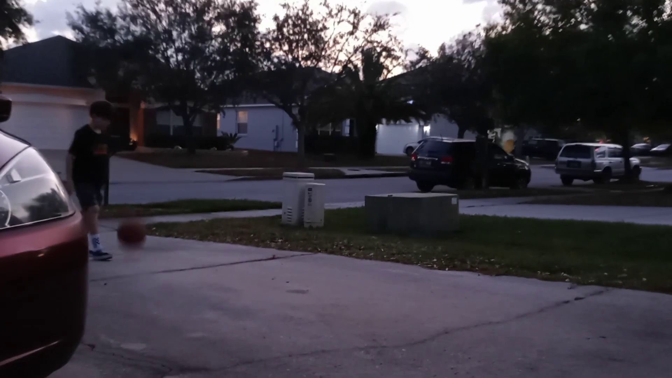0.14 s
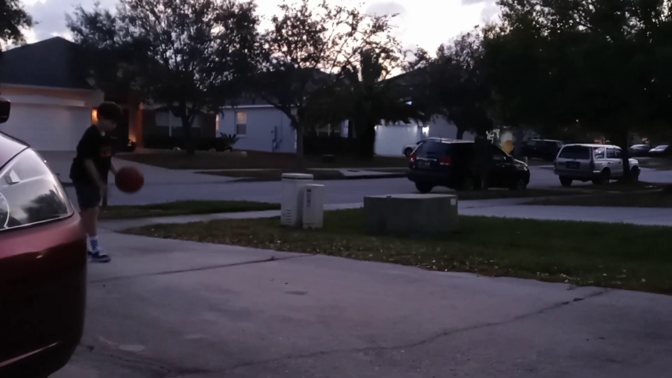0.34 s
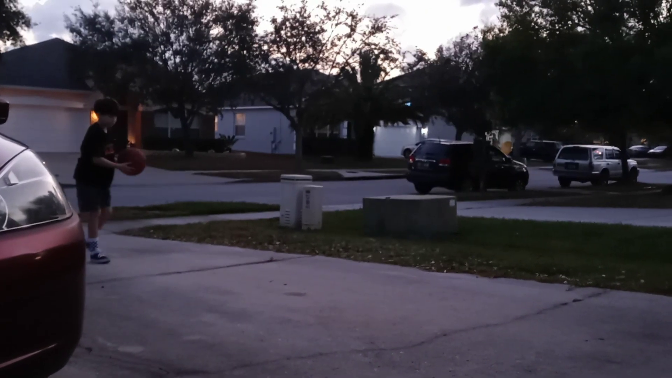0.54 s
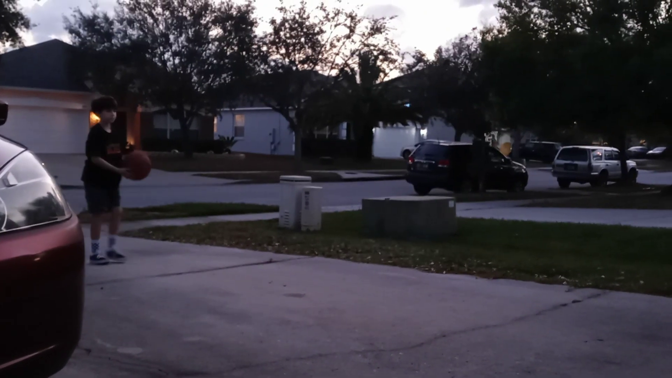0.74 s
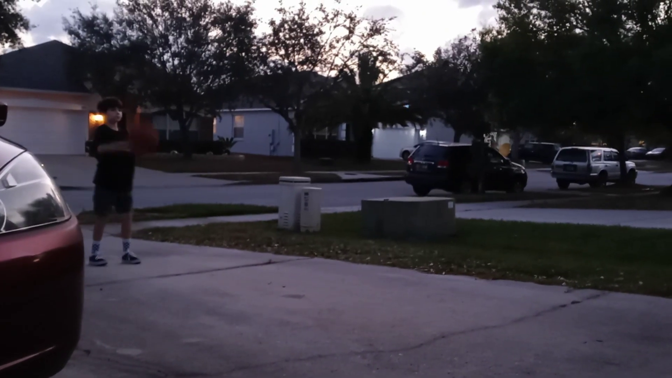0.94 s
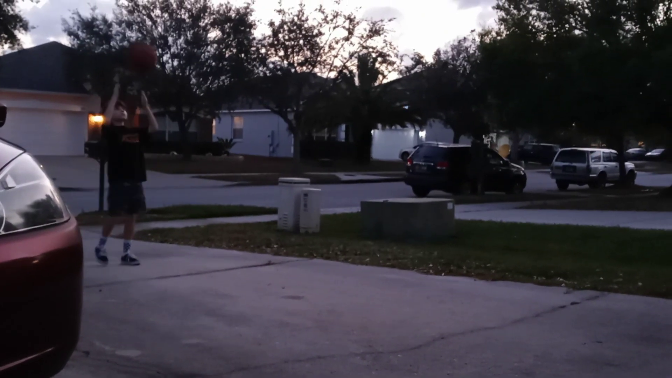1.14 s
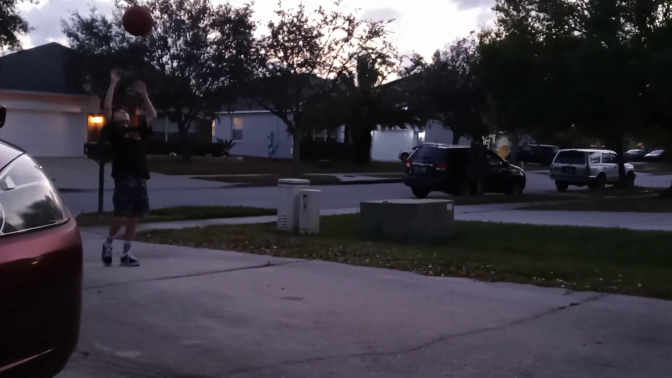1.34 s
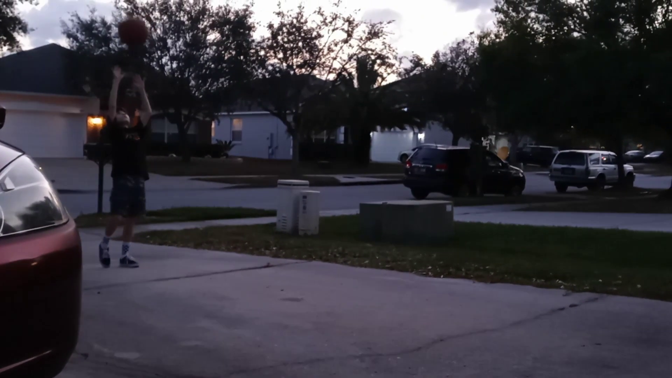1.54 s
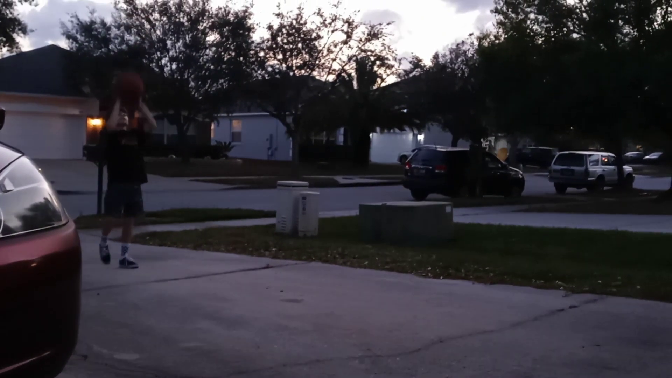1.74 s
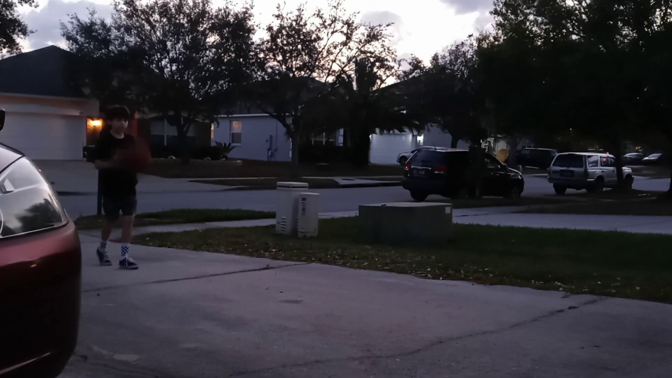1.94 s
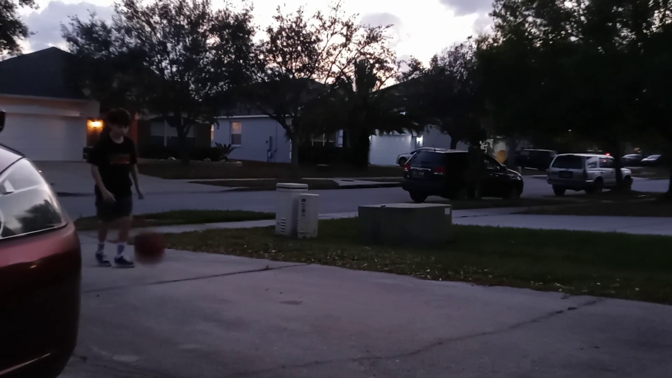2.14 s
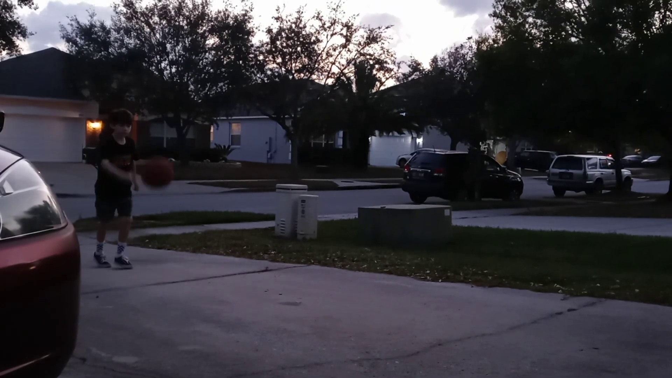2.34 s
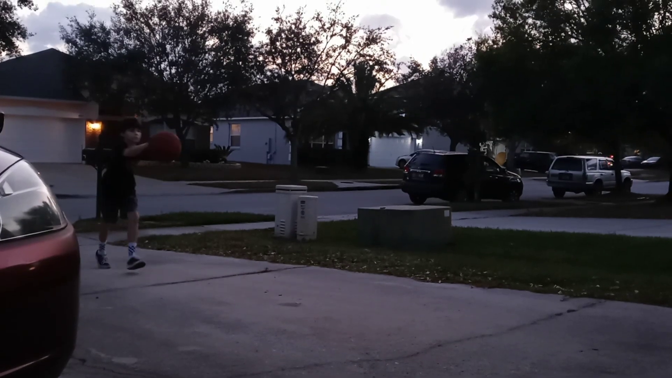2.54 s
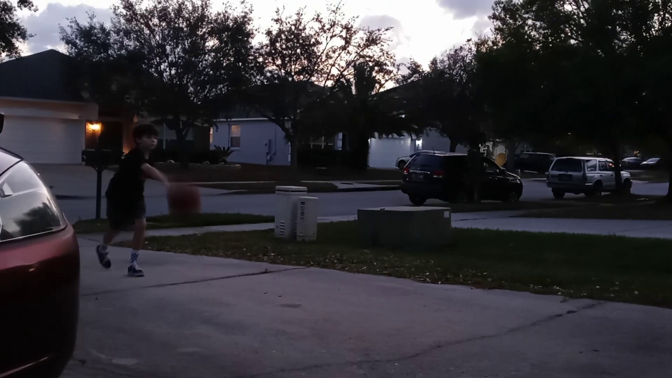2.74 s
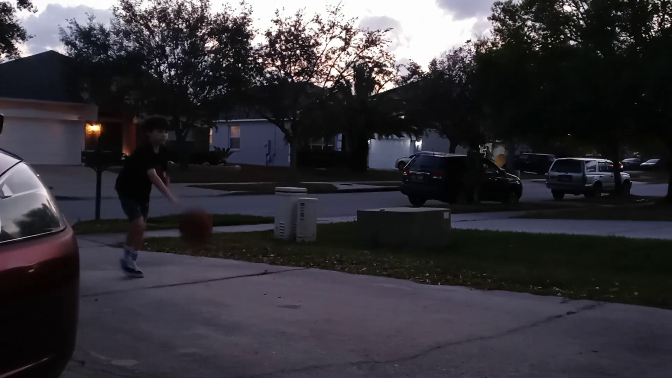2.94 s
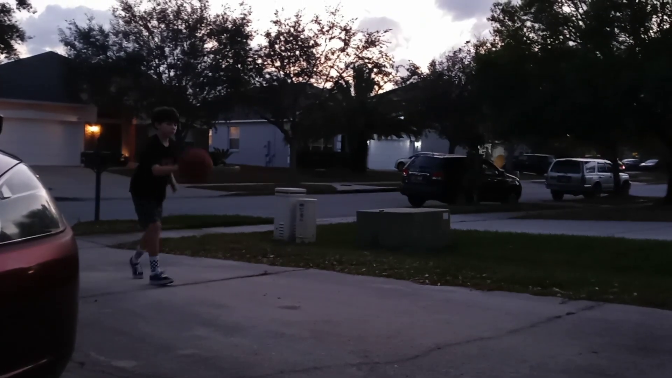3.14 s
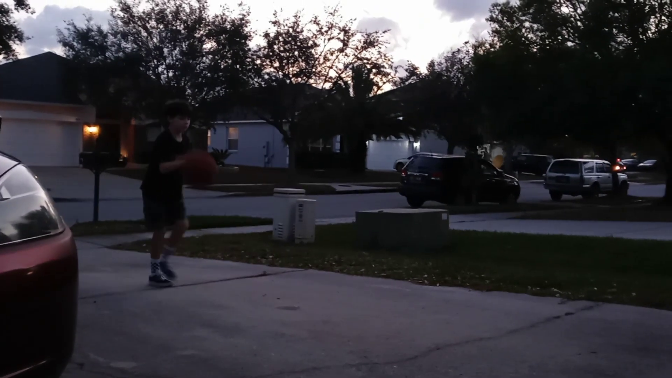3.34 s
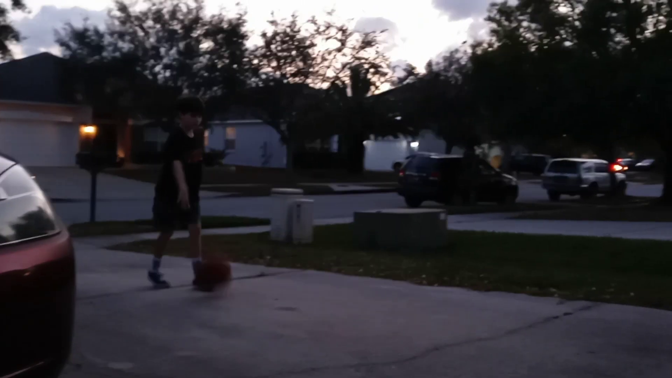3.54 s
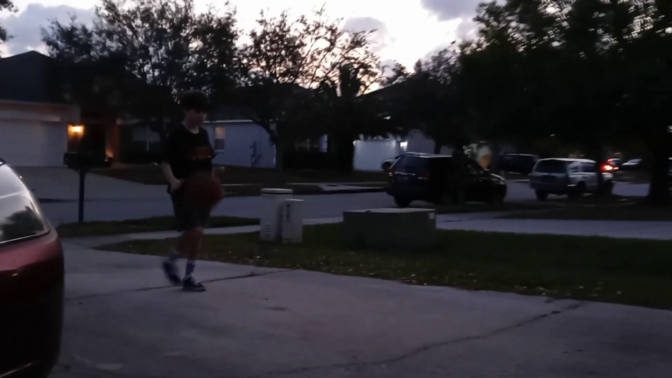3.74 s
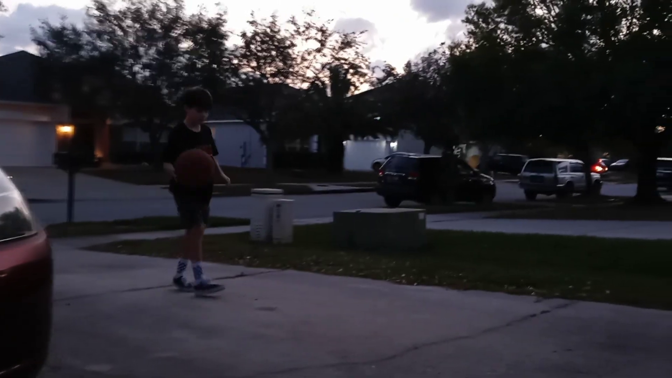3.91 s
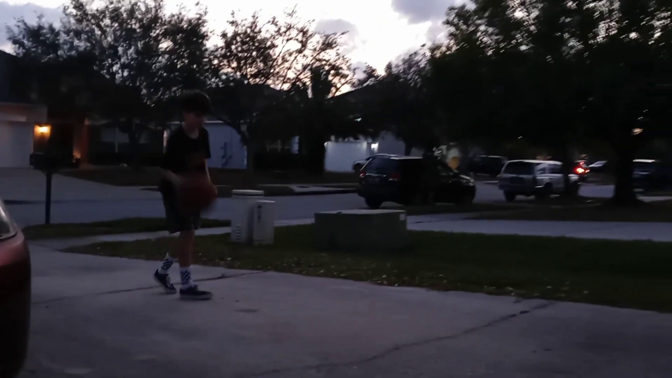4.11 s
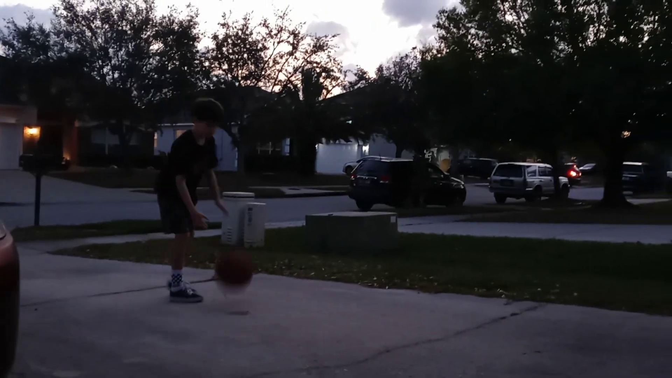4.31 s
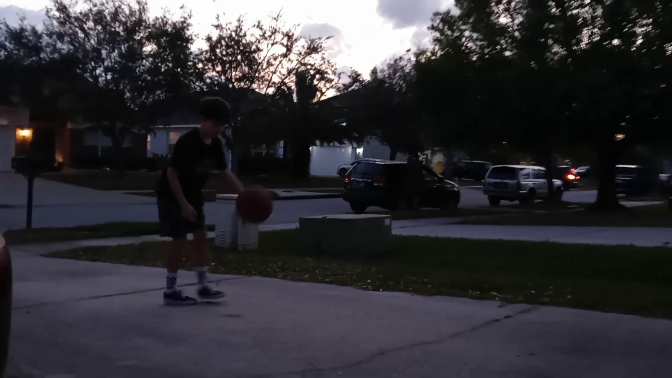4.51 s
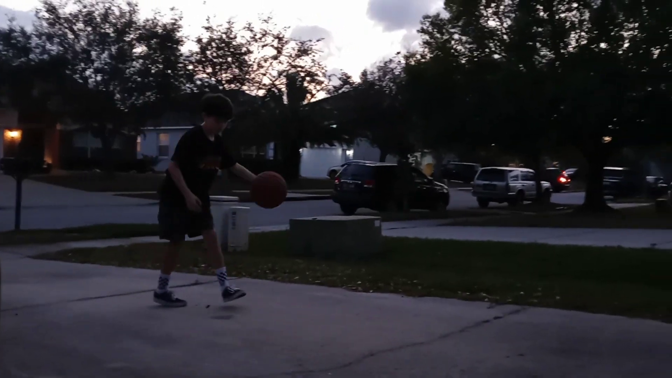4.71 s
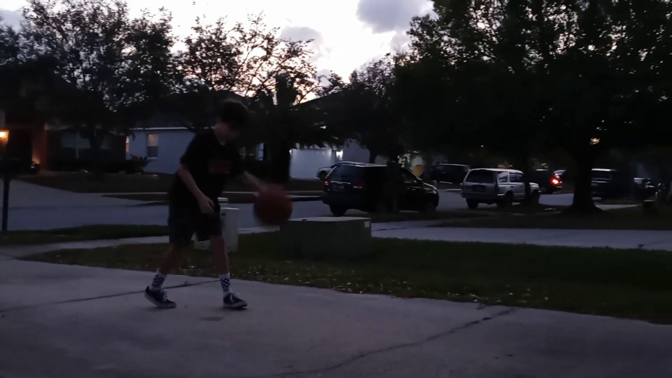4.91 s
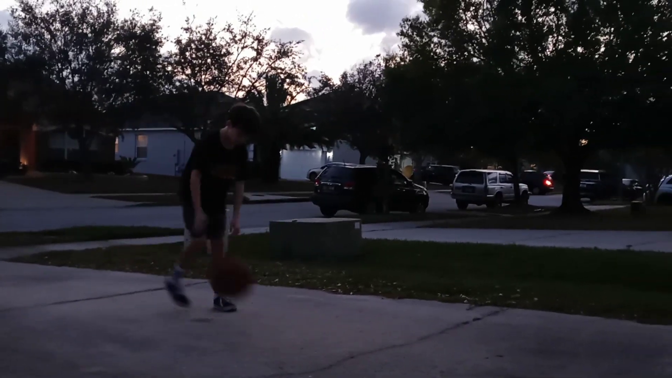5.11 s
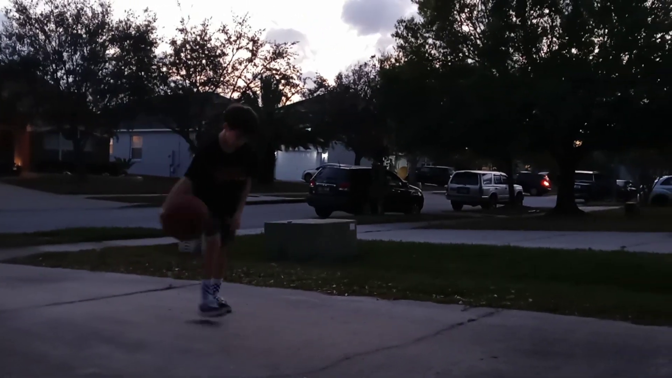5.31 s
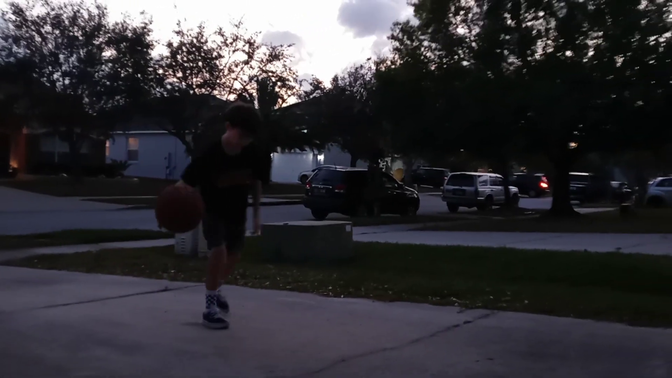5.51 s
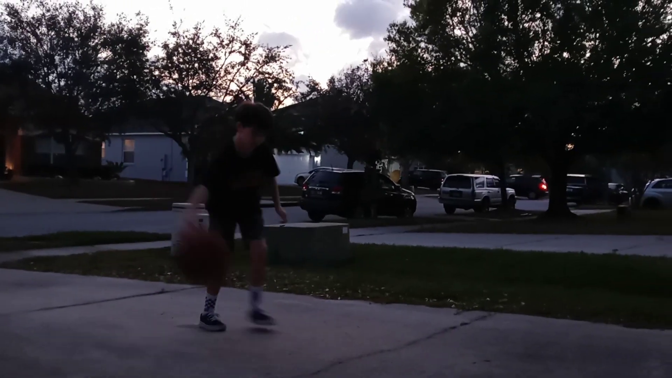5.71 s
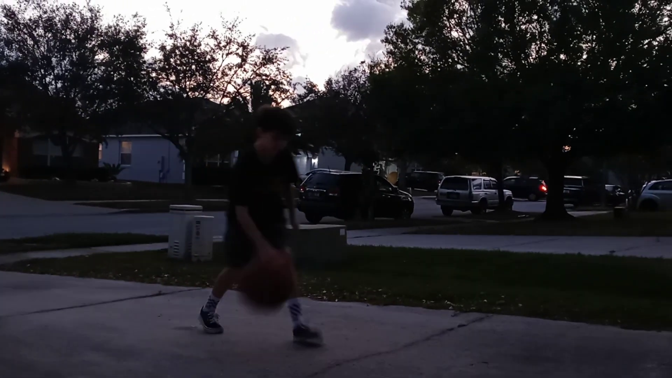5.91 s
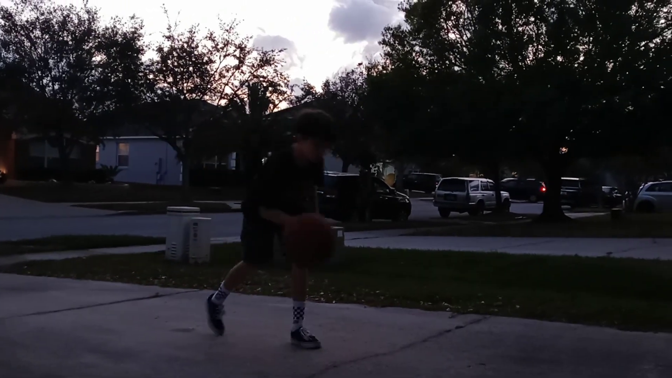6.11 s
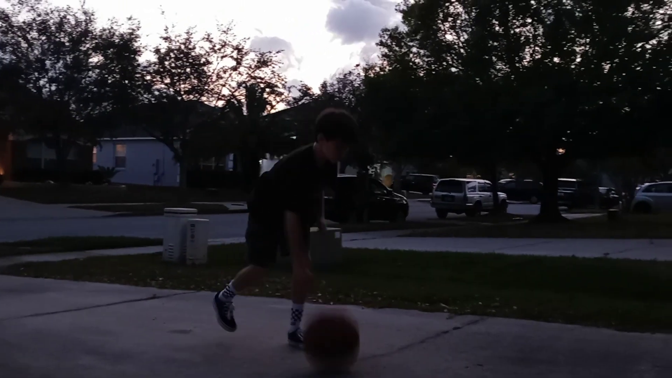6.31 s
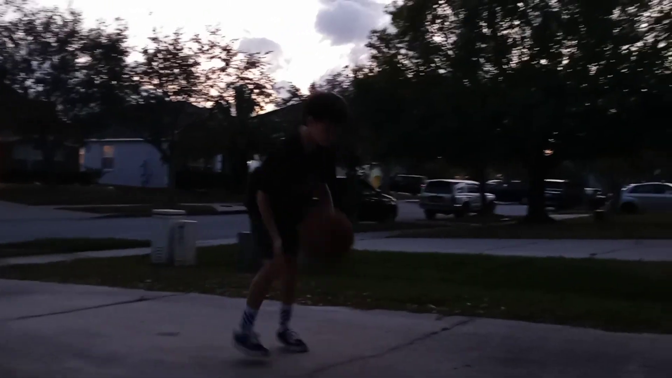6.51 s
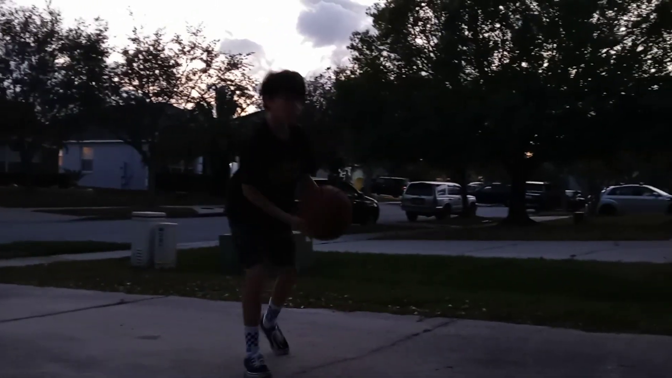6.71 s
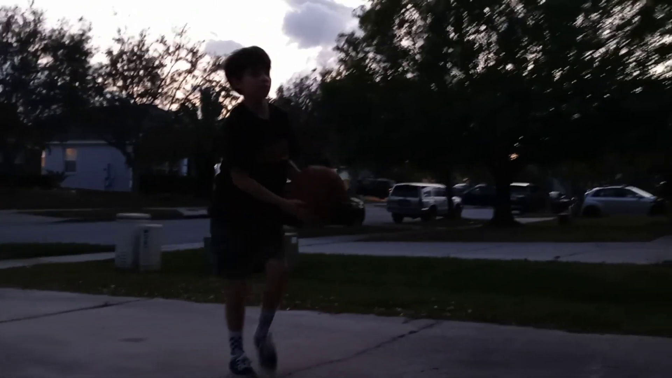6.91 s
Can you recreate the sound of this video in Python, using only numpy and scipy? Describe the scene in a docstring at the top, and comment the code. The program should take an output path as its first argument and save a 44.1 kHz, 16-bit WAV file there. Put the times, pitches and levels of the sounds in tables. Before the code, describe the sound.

A basketball bounces on a concrete driveway, at first sparsely, then in a steadier dribble coming closer, with shoe scuffs, hand slaps and distant traffic.

```python
"""A basketball is bounced on a concrete driveway by a player who works towards the microphone.
From the start, distant traffic and hiss (filtered noise) lie under a thin sizzle (narrow-band noise) that dies away;
fine grit ticks (filtered impulses) and shoes scuff (grainy noise bursts). Each bounce is then a thump (one swing of
pressure), a crack (noise bursts) and a ring of shell and air (damped modes), returned by car, house and yard.
Later grit snaps (clicks), cloth rustles (soft noise), hands slap the ball (dull clicks) and the feet shuffle."""
import sys
import numpy as np
from scipy import signal
from scipy.fft import rfft, irfft
from scipy.io import wavfile
from scipy.ndimage import uniform_filter1d, minimum_filter1d

SR = 44100
rng = np.random.default_rng(int(sys.argv[2]) if len(sys.argv) > 2 else 0)


def put_to_file(sound):
    """Save the sound as 16-bit audio at rate SR, in the file named by the first command-line argument."""
    columns = np.atleast_2d(sound).T  # one column per channel
    safe = np.clip(columns, -1, 1)
    whole_steps = np.round(safe * 32767)
    wavfile.write(sys.argv[1], SR, whole_steps.astype(np.int16))


N = 306936
TIME = np.arange(N) / SR  # s, whole scene
BLOW_TIME = np.arange(SR) / SR  # s, within one blow

# All levels are relative; a spectrum is a level curve over frequency, rescaled wherever it is used.
# level of distant traffic, before its sway: start_s, level_db
TRAFFIC_LEVEL = [(0, -42.5), (.8, -44), (2.7, -43.5), (3.3, -43), (6.96, -42.5)]
# spectrum of distant traffic: pitch_hz, level_db
TRAFFIC_SPECTRUM = [(25, -21), (45, -15.5), (70, 0), (120, 1.5), (230, -2.5), (330, -13), (550, -13),
                    (830, -6), (1250, -13), (1650, -22.5), (2150, -34), (3000, -58), (6000, -46)]
# spectrum of the hiss of the air: pitch_hz, level_db
HISS_SPECTRUM = [(1500, -27), (2600, -7), (3500, 1), (5200, -6.5), (6700, -3), (7500, -17.5),
                 (10000, -18.5), (12500, -11.5), (16000, -21)]
# soles scraping as the player turns and pushes off: start_s, length_s, level_db at the starting spot,
# tilt_db per octave in the treble
SCUFF_EVENTS = [(0, 0.081, -47.5, -11), (0.159, 0.025, -43.5, -1), (0.533, 0.01, -45.5, -1),
                (1.092, 0.044, -48, 6), (1.287, 0.026, -48.5, 0), (2.057, 0.04, -45.5, -4),
                (3.181, 0.02, -43, -4), (4.04, 0.012, -36, 2.5), (5.349, 0.014, -47, -5),
                (5.4545, 0.01, -31.5, 3.5), (6.244, 0.02, -50, 4), (6.673, 0.017, -35, -1.5),
                (6.7, 0.029, -30, 1), (6.762, .19, -61, 4)]
# spectrum of shoe and grit on concrete: pitch_hz, level_db
SCUFF_SPECTRUM = [(200, -7.5), (1000, -11), (2200, -9.5), (3400, 1.5), (5000, -1.5), (6400, 0.5),
                  (7800, -16.5), (10000, -8.5), (12500, -1), (16000, -16)]
# bounces: start_s, force_db, crack_db over thump, ring_db, strong_hz (strongest ring), ping (which lingers), ping_db
BOUNCE_EVENTS = [ (0.2017, -16.5, 22, -29, 1137, "high", -47.5),
                 (2.2033, -15.5, 26, -26, 1800, "high", -38.5),
                 (2.9385, -13, 20.5, -16.5, 1120, "high", -46),
                 (3.6165, -12.5, 21, -18.5, 1675, "low", -55), (4.3675, -18, 24, -20.5, 1638, "low", -41),
                 (5.1524, -12.5, 20, -15.5, 1030, "low", -57),
                 (5.9099, -14.5, 20.5, -17.5, 1309, "low", -46),
                 (6.3944, -13, 21.5, -18.5, 1398, "low", -45)]
# spectrum of rubber cracking on concrete, before its tilt: pitch_hz, level_db
CRACK_SPECTRUM = [(150, -24), (400, -9.5), (600, -6), (1100, -6), (1800, -0.5), (2300, -5.5), (3000, -5),
                  (3800, 2), (5000, -5.5), (6500, -5.5), (7800, -18), (10000, -13), (12500, -8),
                  (16000, -17.5)]
# deep wobbles of the rubber shell, before random scatter: pitch_hz, level_db, t60_s
SHELL_MODES = [(108.5, -14.5, 0.28), (195.3, -13.5, 0.18), (248.2, -11, 0.22), (346, -13, 0.13),
               (391, -8.5, 0.086), (490.5, -14, 0.16), (797, -6.5, 0.051), (932, -8.5, 0.057)]
# ring of the air inside the ball, before random scatter: pitch_hz, level_db, t60_s
AIR_MODES = [(1041.6, -8, 0.081), (1119, -4.5, 0.052), (1236, -9, 0.13), (1457, -5.5, 0.042),
             (1676, -12.5, 0.08), (1770, -16.5, 0.08), (1970, -10, 0.031), (3033, -14, 0.035),
             (3660, -15, 0.077)]
# two air modes that linger as a faint ping, low then high: pitch_hz, t60_s
PING_MODES = [(2169, .55), (2864, 1.15)]
# echoes off the garage and the house: delay_s, level_db, top_hz
HOUSE_ECHOES = [(0.0092, -12.5, 500), (.0138, -18, 5016), (0.028, -15.5, 400), (0.032, -14, 1496),
                (0.0475, -13.5, 455), (.063, -20, 404), (.078, -26.5, 400), (.092, -17, 346)]
# diffuse reverberation of the yard by band: pitch_hz, level_db, t60_s
YARD_BANDS = [(61.2, 5, 0.42), (132, -6, 0.77), (305, -3, 0.33), (610, 4.5, 0.36), (1220, -4.5, 0.49),
              (2400, -1, 0.41), (4180, -10, 0.48), (6550, 0.5, 0.44), (8400, 6.5, 0.33),
              (12140, -6.5, 0.32), (16000, -21, .2)]
# grit snapping under a shoe: start_s, level_db
GRIT_SNAPS = [(2.7615, -15), (2.767, -27), (4.7502, -25.5), (5.975, -14), (6.003, -15), (6.7194, -28)]
# clothes rubbing as the ball is gathered: start_s, length_s, level_db
RUSTLE_EVENTS = [(3.983, 0.076, -45), (4.086, 0.049, -41)]
# spectrum of cloth: pitch_hz, level_db
CLOTH_SPECTRUM = [(80, -12), (150, -8), (380, 4), (600, -21), (2000, -32), (12000, -28)]
# hands meeting the ball: start_s, level_db
SLAP_EVENTS = [(4.043, -38), (5.4742, -2.5), (6.941, -11.5)]
# spectrum of a slap: pitch_hz, level_db
SLAP_SPECTRUM = [(80, 5), (300, 3.5), (900, 7), (1500, -4), (2400, -0.5), (3500, -8.5), (8000, -39),
                 (16000, -40)]

# the player dribbles on the spot, then walks towards the microphone
START_M, SETS_OFF_S, WALK_M_S = 8.14, 2.26, 0.74
# hiss at the starting spot, and its rise per dB of nearness
HISS_DB, HISS_RISE_PER_DB = -58, 1.2
# sizzle: steady level, extra level and pitch at the start, and the pitch it tends to
SIZZLE_DB, SIZZLE_FLARE_DB, SIZZLE_START_HZ, SIZZLE_HZ = -60, 13, 3950, 4490
# time constants of its flare and glide, then its dying away
SIZZLE_SETTLE_S, SIZZLE_GLIDE_S, SIZZLE_ENDS_S, SIZZLE_FADE_DB_PER_S = 0.14, .25, 2.05, 11
# contact time of a thump of usual level; louder thumps leave the ground sooner (exponent per dB)
USUAL_DB, CONTACT_S, SHORTER_PER_DB = -13, 0.00634, 0.08
CRACK_TILT_DB, SHELL_DB = .4, -18.5  # tilt per octave in the treble; level of the shell modes
# reverberation of a bounce at the starting spot, and its fall per dB that the direct sound gains
WET_DB, DRIER_PER_DB = 0, 1.13
# typical light shuffle; pace, length and level vary
SHUFFLE_FROM_S, SHUFFLE_EVERY_S, SHUFFLE_S, SHUFFLE_DB, SHUFFLE_TILT_DB = 4.1, .2, 0.048, -56, 1
TOP_HZ = 15800  # upper limit of the recorded band


def undb(db):
    """Decibel law: level to amplitude gain."""
    return 10 ** (np.asarray(db) / 20)


def unit(x):
    """Normalisation to rms 1."""
    return x / np.sqrt(np.mean(x ** 2))


def add(out, start_s, x):
    """Superposition: mix x into out from start_s on."""
    i = max(int(start_s * SR), 0)
    out[i:i + len(x)] += x[:max(len(out) - i, 0)]


def along(points, hz):
    """Linear interpolation of (Hz, value) points on a log-frequency axis."""
    point_hz, value = np.transpose(points)
    return np.interp(np.log(hz + 1), np.log(point_hz), value)


def noise(spectrum, size):
    """Spectral shaping: white noise weighted by a spectrum, at rms 1."""
    weight = undb(along(spectrum, np.fft.rfftfreq(size, 1 / SR)))
    return unit(irfft(rfft(rng.standard_normal(size)) * weight, size))


def click(spectrum, tilt_db=0, size=1024):
    """Minimum phase: folding the cepstrum gives a causal click of unit energy with the given spectrum."""
    hz = np.fft.rfftfreq(size, 1 / SR)
    level_db = along(spectrum, hz) + tilt_db * np.log2(1 + hz / 2000)
    cepstrum = irfft(np.log(undb(level_db)))
    cepstrum[1:size // 2] *= 2
    cepstrum[size // 2 + 1:] = 0
    y = irfft(np.exp(rfft(cepstrum)))
    return y / np.linalg.norm(y)


def butter(x, hz, kind, order=2):
    """Butterworth filtering, low-pass or high-pass."""
    sos = signal.butter(order, min(hz, .45 * SR), kind, fs=SR, output="sos")
    return signal.sosfilt(sos, x)


def fade(t60):
    """Exponential decay: 60 dB in t60 seconds."""
    return np.exp(-np.log(1000) * BLOW_TIME / t60)


def mode(hz, t60):
    """Damped resonance: a decaying sine."""
    return np.sin(2 * np.pi * hz * BLOW_TIME) * fade(t60)


def burst(t60):
    """Exponential decay of white noise, at unit energy."""
    y = rng.standard_normal(SR) * fade(t60)
    return y / np.linalg.norm(y)


def walk(rate):
    """Smoothed random drift: rate independent values a second, averaged twice."""
    k = int(SR / rate)
    steps = np.repeat(rng.standard_normal(N // k + 1), k)
    return uniform_filter1d(uniform_filter1d(steps, k), k)[:N]


def nearness_db(s):
    """Inverse distance law: gain of the direct sound over that from the starting spot."""
    metres = START_M - WALK_M_S * np.maximum(s - SETS_OFF_S, 0)
    return 20 * np.log10(START_M / np.maximum(metres, 1))


def traffic(sway_db=2.33):
    """Random amplitude modulation: far traffic is shaped noise that swells slowly."""
    level_db = np.interp(TIME, *np.transpose(TRAFFIC_LEVEL)) + sway_db * walk(3.428)
    return undb(level_db) * noise(TRAFFIC_SPECTRUM, N)


def hiss(flicker_db=4.0):
    """Random amplitude modulation: the hiss flickers, and grows with the player's nearness."""
    level_db = HISS_DB + HISS_RISE_PER_DB * nearness_db(TIME) + flicker_db * walk(20)
    return undb(level_db) * noise(HISS_SPECTRUM, N)


def sizzle(width_hz=260):
    """Modulated carrier: low-passed noise on a rising sine makes a narrow band that flares, holds and fades."""
    flare_db = SIZZLE_FLARE_DB * np.exp(-TIME / SIZZLE_SETTLE_S)
    fall_db = SIZZLE_FADE_DB_PER_S * np.maximum(TIME - SIZZLE_ENDS_S, 0)
    hz = SIZZLE_HZ + (SIZZLE_START_HZ - SIZZLE_HZ) * np.exp(-TIME / SIZZLE_GLIDE_S)
    flutter = unit(butter(rng.standard_normal(N), width_hz, "low", order=3))
    carrier = np.sin(2 * np.pi * np.cumsum(hz) / SR)
    return undb(SIZZLE_DB + flare_db - fall_db) * unit(flutter * carrier)


def background():
    """Superposition of the continuous sources."""
    return traffic() + hiss() + sizzle()


def sand(count=50, db=-47, spread_db=8, nearer_db=10, tilt_db=5):
    """Random impulses: fine grains tick under the shoes, louder as the scene goes on."""
    ticks = np.zeros(N)
    when, size = rng.random((count, 2)).T  # both from 0 to 1
    ticks[(when * N).astype(int)] = undb(db + spread_db * size + nearer_db * when)
    return signal.fftconvolve(ticks, click(SCUFF_SPECTRUM, tilt_db))[:N]


def scuffs(grain_db=3):
    """Stick and slip: grains of random strength give each scrape of a sole a rough texture."""
    out = np.zeros(N)
    for start_s, length_s, db, tilt_db in list(SCUFF_EVENTS) + shuffles():
        size = int(length_s * SR)
        grains = rng.standard_normal(size) * undb(grain_db * rng.exponential(size=size))
        scrape = unit(grains) * signal.windows.tukey(size, .5)
        coloured = np.convolve(scrape, click(SCUFF_SPECTRUM, tilt_db))
        add(out, start_s, undb(db + nearness_db(start_s)) * coloured)
    return out


def thump(contact_s, sag_hz=92, sag_t60=0.025, sag_db=-9, cut_hz=50):
    """Elastic rebound: the ball flattens and springs back, one swing of pressure and then a deep wobble."""
    y = np.sin(2 * np.pi * BLOW_TIME / contact_s) * (BLOW_TIME < contact_s)
    add(y, contact_s, undb(sag_db) * mode(sag_hz, sag_t60))
    return butter(y, cut_hz, "high")


def crack(snap_db=0, snap_t60=0.0065, rasp_db=-6, rasp_t60=0.06, touch_db=-5):
    """Impulsive contact: air is squeezed out at first touch, then the pebbled skin snaps and rasps as contact spreads."""
    grains = undb(snap_db) * burst(snap_t60) + undb(rasp_db) * burst(rasp_t60)
    grains[0] -= undb(touch_db)
    return grains


def ring(modes, scatter_db=2):
    """Modal superposition: level, pitch and sign vary a little with the spot that lands."""
    total = 0
    for hz, db, t60 in modes:
        louder, sharper, sign = rng.standard_normal(3)
        resonance = mode(hz * (1 + 0.004 * sharper), t60)
        total = total + np.sign(sign) * undb(db + scatter_db * louder) * resonance
    return total


def shell(strong_hz, strong_db=-4, strong_t60=0.081, swell_s=0.00032):
    """Cavity resonance: the air starts to ring as the shell is pressed in, and one mode stands out."""
    modes = ring(AIR_MODES) + undb(strong_db) * mode(strong_hz, strong_t60)
    return modes * (1 - np.exp(-BLOW_TIME / swell_s))


def echoes(x, start_s, car_s=0.0052, car_db=-9, leaving_db=0.7):
    """Specular reflection: direct sound and echoes; the bright one off the car weakens by leaving_db per second."""
    out = x.copy()
    add(out, car_s, undb(car_db - leaving_db * start_s) * butter(x, 3000, "high", order=1))
    for delay_s, db, top_hz in HOUSE_ECHOES:
        add(out, delay_s, undb(db) * butter(x, top_hz, "low", order=1))
    return out


def yard(x, build_s=0.0043, house_s=0.037, house_db=1.0, far_db=-17):
    """Diffuse reverberation: banded scatter, stronger once the house front answers, plus a faint longer far return."""
    hz, spectrum = np.fft.rfftfreq(SR, 1 / SR), rfft(rng.standard_normal(SR))
    centres_hz = [row[0] for row in YARD_BANDS]
    tail = 0
    for own, (_, db, t60) in zip(np.eye(len(YARD_BANDS)), YARD_BANDS):
        # each band is a triangle between its neighbours on the log-frequency axis
        band = irfft(spectrum * along(np.c_[centres_hz, own], hz))
        decay = fade(t60)
        tail = tail + undb(db) * band * decay / np.linalg.norm(decay)
    tail = tail * undb(-house_db * (BLOW_TIME < house_s))
    tail = tail + undb(far_db) * butter(burst(1.4), 8700, "low")
    build_up = 1 - np.exp(-(BLOW_TIME / build_s) ** 2)
    return signal.fftconvolve(x, tail * build_up)


def bounces():
    """Impact excitation: force and nearness set thump, crack and contact time; each bounce has its own reverberation."""
    out, pings = np.zeros(N), dict(zip(("low", "high"), PING_MODES))
    for start_s, force_db, crack_db, ring_db, strong_hz, ping, ping_db in BOUNCE_EVENTS:
        near_db = nearness_db(start_s)
        thump_db = force_db + near_db
        contact_s = CONTACT_S * np.exp(-SHORTER_PER_DB * (thump_db - USUAL_DB))
        body = undb(thump_db) * thump(contact_s)
        body += undb(SHELL_DB) * ring(SHELL_MODES)
        body += undb(ring_db + near_db) * shell(strong_hz)
        crack_click = undb(thump_db + crack_db) * click(CRACK_SPECTRUM, CRACK_TILT_DB)
        blow = body + signal.fftconvolve(crack(), crack_click)[:SR]
        lingering = undb(ping_db + near_db) * mode(*pings[ping])
        add(out, start_s, echoes(blow, start_s) + lingering)
        # the yard gathers sound from all sides of the ball, which evens out the grain of the crack
        add(body, 0, crack_click)
        add(out, start_s, undb(WET_DB - DRIER_PER_DB * near_db) * yard(body))
    return out


def grit():
    """Impulse response: each lone snap of grit is one click."""
    out = np.zeros(N)
    for start_s, db in GRIT_SNAPS:
        add(out, start_s, undb(db) * click(SCUFF_SPECTRUM))
    return out


def rustles():
    """Friction noise: rubbing cloth is soft noise that swells and fades."""
    out = np.zeros(N)
    for start_s, length_s, db in RUSTLE_EVENTS:
        size = int(length_s * SR)
        add(out, start_s, undb(db) * noise(CLOTH_SPECTRUM, size) * np.hanning(size))
    return out


def slaps(skin_db=-4):
    """Damped impact: a hand on the ball is a dull impulse with a short noisy tail."""
    out = np.zeros(N)
    for start_s, db in SLAP_EVENTS:
        touch = undb(skin_db) * burst(0.048)
        touch[0] += 1
        add(out, start_s, undb(db) * signal.fftconvolve(touch, click(SLAP_SPECTRUM)))
    return out


def shuffles(count=15, stray_s=0.051, spread_db=2.0):
    """Irregular rhythm: faint scuffs of the moving feet, as rows like those of SCUFF_EVENTS."""
    rows = []
    for k, (late, long, loud) in enumerate(rng.standard_normal((count, 3))):
        start_s = SHUFFLE_FROM_S + k * SHUFFLE_EVERY_S + stray_s * late
        length_s = SHUFFLE_S * 2 ** (long / 2)
        rows.append((start_s, length_s, SHUFFLE_DB + spread_db * loud, SHUFFLE_TILT_DB))
    return rows


def player(wet_db=-4):
    """Superposition of shoes, grit, cloth and hands, with the yard's reverberation."""
    close = sand() + scuffs() + grit() + rustles() + slaps()
    return close + undb(wet_db) * yard(close)[:N]


def scene():
    """Superposition of street, player and ball at one microphone, which loses the deepest bass."""
    return butter(background() + player() + bounces(), 49, "high")[None]


def record(dry, ceiling=1.44, size=441):
    """Gain control: a look-ahead limiter holds down peaks, the last overshoot clips, and the top is cut."""
    room_left = ceiling / np.maximum(np.abs(dry), ceiling)
    gain = uniform_filter1d(minimum_filter1d(room_left, size), size)
    limited = np.clip(dry * gain, -.95, .95)
    top_cut = signal.ellip(8, .2, 70, TOP_HZ, fs=SR, output="sos")
    return signal.sosfilt(top_cut, limited)


dry = scene()
out = record(dry)
put_to_file(out)
```